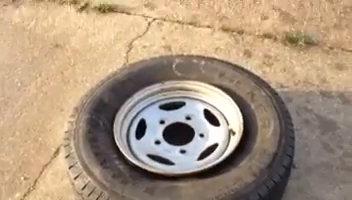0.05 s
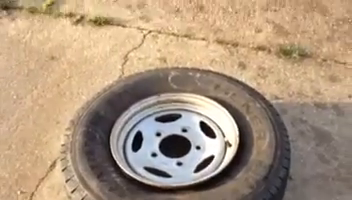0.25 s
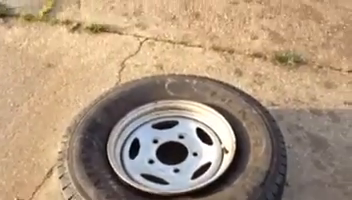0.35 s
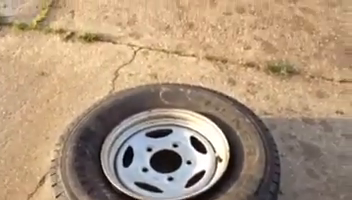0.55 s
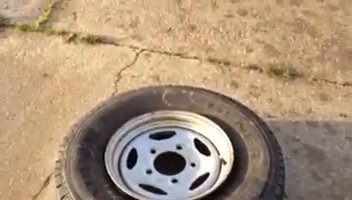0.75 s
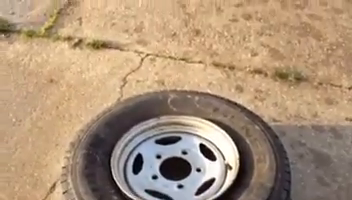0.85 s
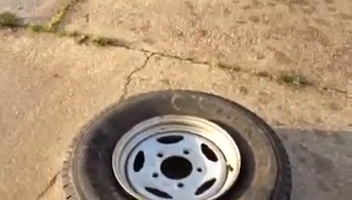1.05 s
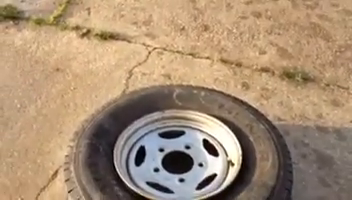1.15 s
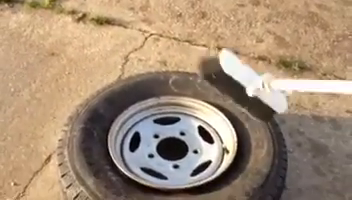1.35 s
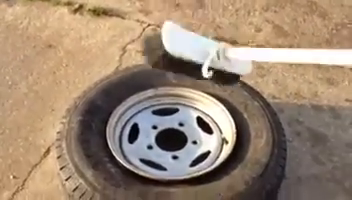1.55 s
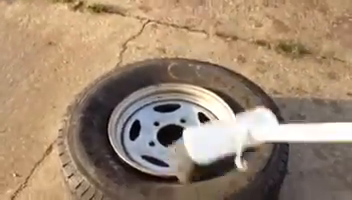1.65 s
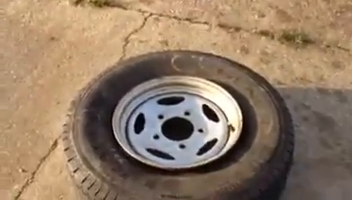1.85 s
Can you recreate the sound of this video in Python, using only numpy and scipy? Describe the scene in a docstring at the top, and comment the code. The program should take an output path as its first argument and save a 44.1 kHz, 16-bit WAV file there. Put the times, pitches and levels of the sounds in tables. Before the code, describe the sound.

Sudden loud bang of a tyre seating on its rim, then faint knocks and ticks.

```python
"""Tyre seating on its rim

A tyre lying on concrete bursts onto its steel rim: the bead snaps over in a volley of cracks and
the rim rings in its normal modes. The rubber thumps and booms, air hisses out until the bead seals,
and the yard reverberates. Two small rattles and a knock follow, then a swish and the ticks of a
broom being moved, over faint outdoor noise."""
import sys
import numpy as np
from scipy import signal
from scipy.fft import rfft, irfft, next_fast_len
from scipy.io import wavfile
from scipy.ndimage import map_coordinates

SR = 44100
rng = np.random.default_rng(int(sys.argv[2]) if len(sys.argv) > 2 else 0)


def materialize(psi):
    """Save the field psi as 16-bit PCM at rate SR to the path in sys.argv[1].

    A 1-D psi becomes a single channel; in a 2-D psi each row is a channel.
    """
    bounded = np.clip(np.atleast_2d(psi).T, -1, 1)
    quanta = np.round(bounded * 32767).astype(np.int16)
    wavfile.write(sys.argv[1], SR, quanta)


N = 83790


def amp(db):
    """Amplitude ratio of a level in decibels."""
    return 10 ** (np.asarray(db) / 20)


def unit(x):
    """Normalisation to unit rms."""
    return x / np.sqrt(np.mean(x ** 2) + 1e-20)


def along(points, hz):
    """Interpolation of (f/Hz, value) points on a logarithmic frequency axis."""
    f, v = np.transpose(points)
    return np.interp(np.log(hz + 1), np.log(f + 1), v)


def since(s):
    """Time elapsed since s, zero before it."""
    return np.maximum(np.arange(N) / SR - s, 0)


def envelope(s, attack, t60, hold=0):
    """Exponential rise from time s; after the hold, a decay of 60 dB per t60."""
    t = since(s)
    return (1 - np.exp(-t / attack)) * 1000. ** (-np.maximum(t - hold, 0) / t60)


def swell(s, rise, fall):
    """Asymmetric Gaussian pulse peaking at time s."""
    t = np.arange(N) / SR - s
    return np.exp(-(t / np.where(t < 0, rise, fall)) ** 2)


def filtered(x, response):
    """Linear filtering: the spectrum is multiplied by a frequency response."""
    size = next_fast_len(N + SR // 4)
    return irfft(rfft(x, size) * response(np.fft.rfftfreq(size, 1 / SR)), size)[:N]


def noise(*spectra):
    """Random-phase noise of unit rms, shaped by the sum of (f/Hz, level/dB) curves."""
    size = next_fast_len(N)
    hz = np.fft.rfftfreq(size, 1 / SR)
    gain = amp(sum(along(curve, hz) for curve in spectra))
    return unit(irfft(gain * np.exp(2j * np.pi * rng.random(len(hz))), size)[:N])


def burst(shape, x):
    """Energy normalisation: x takes the energy of the envelope that shaped it."""
    return unit(x) * np.sqrt(np.mean(shape ** 2))


def ring(modes, s, attack):
    """Modal superposition: damped sinusoids of random phase, excited at time s."""
    return sum(amp(db) * envelope(s, attack, t60) * np.sin(2 * np.pi * (hz * since(s) + rng.random()))
               for hz, db, t60 in modes)


def with_scatter(x, scatter_db=-12.5):
    """Convolution with a short diffuse response adds scatter from the ground and walls."""
    tail = envelope(0, attack=0.0014, t60=0.073) * rng.standard_normal(N)
    return x + amp(scatter_db) * signal.fftconvolve(x, tail / np.linalg.norm(tail))[:N]


# ambient spectrum: f/Hz, relative level/dB
AMBIENT_SPECTRUM = [(25, -28), (60, -13), (120, -8), (190, -4), (300, -14), (500, -14), (650, -16.5),
                    (980, -12), (1400, -15.5), (2000, -20.5), (2900, -29.5), (4300, -29), (7500, -36),
                    (11800, -41.5), (14300, -33.5), (15500, -44)]
# ambient trend: t/s, level/dB
AMBIENT_TREND = [(0, -61.5), (.2, -60.5), (.6, -57.5), (.82, -62), (1.0, -59), (1.2, -57), (1.6, -56.5),
                 (1.9, -59.5)]
# soft bumps: t/s, level/dB, rise/s, fall/s
LOW_BUMPS = [(.097, -49.5, 0.039, 0.016), (0.188, -50.5, 0.015, 0.015), (.545, -55.5, 0.081, 0.018),
             (0.979, -50.5, 0.017, 0.004), (1.201, -55, 0.014, 0.037)]
# their spectrum: f/Hz, relative level/dB
BUMP_SPECTRUM = [(50, -28), (100, -2.5), (135, 1), (190, -10.5), (300, -38), (1000, -68)]


def outdoors(waver_db=1.26, waver_per_s=22):
    """Amplitude modulation: distant noise wavers at random, and low noise swells in soft bumps."""
    t = since(0)
    waver = map_coordinates(rng.standard_normal(256), [t * waver_per_s])
    level_db = np.interp(t, *np.transpose(AMBIENT_TREND)) + waver_db * waver
    bumps = sum(amp(db) * swell(s, rise, fall) for s, db, rise, fall in LOW_BUMPS)
    return amp(level_db) * noise(AMBIENT_SPECTRUM) + bumps * noise(BUMP_SPECTRUM)


# broom contacts: t/s, level/dB, excitation T60/s, resonance f/Hz, quality factor Q
BROOM_CONTACTS = [(1.2913, -51, 0.015, 2020, 8.8), (1.4733, -36.5, 0.0025, 4400, 1.6),
                  (1.4758, -44, 0.0066, 5500, 2), (1.496, -48.5, 0.061, 5500, 2),
                  (1.497, -51, 0.025, 2240, 8.8), (1.508, -47.5, 0.018, 11000, 1.7),
                  (1.536, -51, 0.012, 4900, 2.6), (1.541, -52.5, 0.013, 4900, 2.3),
                  (1.6128, -47, 0.024, 5850, 4), (1.6132, -39, 0.015, 2360, 8),
                  (1.6295, -40, 0.0033, 5500, 3.3), (1.6352, -37.5, .006, 5900, 4),
                  (1.6442, -32, 0.0067, 2780, 2.5), (1.648, -59, 0.028, 3450, 1.4),
                  (1.7052, -60, .02, 12000, 1.9), (1.765, -54.5, 0.0067, 8500, 3),
                  (1.839, -45, 0.015, 1450, 6.7), (1.84, -47, 0.0038, 2870, 5.4)]


def broom_ticks():
    """Forced resonance: each brief contact drives one second-order resonator with noise."""
    out = np.zeros(N)
    for s, db, t60, hz, q in BROOM_CONTACTS:
        resonance = lambda f: 1j * f * hz / (q * (hz * hz - f * f) + 1j * f * hz)
        shape = envelope(s, attack=0.0001, t60=t60, hold=0.00031)
        out += amp(db) * burst(shape, filtered(shape * rng.standard_normal(N), resonance))
    return with_scatter(out)


# broom swishes: t/s, level/dB, rise/s, fall/s
BROOM_STROKES = [(0.898, -52.5, 0.023, 0.026), (1.632, -48, 0.013, 0.012)]
# faint rustle: t/s, level/dB
RUSTLE_TREND = [(0, -73.5), (.8, -76.5), (1.0, -70), (1.15, -66.5), (1.4, -75.5), (1.55, -71), (1.75, -70),
                (1.9, -70)]
# spectrum of both: f/Hz, relative level/dB
BROOM_SPECTRUM = [(300, -5), (1200, -1), (2100, 3), (3200, -12.5), (5000, -3), (7800, -1), (9500, -8.5),
                  (12000, -13.5), (15500, -11)]


def broom_swishes():
    """Modulated broadband noise: the moving broom swishes twice above a faint rustle."""
    strokes = sum(amp(db) * swell(s, rise, fall) for s, db, rise, fall in BROOM_STROKES)
    rustle = amp(np.interp(since(0), *np.transpose(RUSTLE_TREND)))
    return (strokes + rustle) * noise(BROOM_SPECTRUM)


# a click, then a thud: t/s, envelope peak level/dB, rise/s, f/Hz
KNOCK_PULSES = [(.647, -33, 0.00047, 3400), (.647, -30, 0.00018, 4200), (0.648, -38.5, 0.00025, 8000),
                (.647, -46, .00016, 13400), (0.6558, -32, 0.00038, 1700), (0.6553, -30.5, 0.00034, 790),
                (0.6552, -37.5, 0.0011, 324)]


def knock():
    """Heavily damped oscillation: each pulse of a dead double knock lasts only a few cycles."""
    out = np.zeros(N)
    for s, db, rise, hz in KNOCK_PULSES:
        age = since(s) / rise
        out += amp(db) * age * np.exp(1 - age) * np.sin(2 * np.pi * hz * since(s))
    return with_scatter(out)


UPPER_HZ, TOP_HZ = 10100, 13500  # the top shelf of rattles and cracks slopes between these
# wheel rattles: t/s, level/dB, attack/s, T60/s, top shelf/dB
WHEEL_RATTLES = [(0.5209, -50.5, 0.0012, .07, 3), (0.527, -40.5, 0.0019, 0.053, 8),
                 (0.538, -51, 0.00083, 0.069, 1), (0.592, -48.5, 0.00056, 0.069, -5)]
# their spectrum: f/Hz, relative level/dB
RATTLE_SPECTRUM = [(200, -7), (900, 1), (1500, 7), (2150, -1.5), (2600, -14.5), (3900, -15), (5000, -8.5),
                   (7000, -16), (8200, -10.5), (11500, -26), (13500, -6), (15500, -30)]


def wheel_rattles():
    """Impact noise: the settling wheel gives short, exponentially decaying bursts."""
    out = np.zeros(N)
    for s, db, attack, t60, top_db in WHEEL_RATTLES:
        shelf = [(UPPER_HZ, 0), (TOP_HZ, top_db)]
        out += amp(db) * envelope(s, attack, t60, hold=0.0038) * noise(RATTLE_SPECTRUM, shelf)
    return out


# start of the leak: t/s, level/dB
LEAK_ONSET = (0.331, -43.5)
# its spectrum: f/Hz, relative level/dB
LEAK_SPECTRUM = [(400, -2), (2000, 5.5), (3300, -11), (4300, -7.5), (4800, 1), (6600, -5), (8000, -1.5),
                 (9500, -18.5), (12000, -17.5), (13800, -7), (15500, -34)]


def air_leak(seal_s=0.432, sag_db_per_s=101):
    """Jet noise: air hisses through a narrowing gap and stops short when the bead seals."""
    s, db = LEAK_ONSET
    gate = envelope(s, attack=0.0031, t60=0.062, hold=seal_s - s)
    return amp(db - sag_db_per_s * since(s)) * gate * noise(LEAK_SPECTRUM)


# initial spectrum of the yard's echo: f/Hz, relative level/dB
YARD_SPECTRUM = [(40, -32.5), (90, -3.5), (200, -1), (500, -4), (900, -3), (1500, -6.5), (2100, -9.5),
                 (3200, -22), (5000, -10), (7600, -13.5), (9500, -20), (12000, -25.5), (14000, -21.5),
                 (15500, -31)]
# reverberation time: f/Hz, T60/s
YARD_T60 = [(150, 0.87), (500, .42), (1200, .35), (3000, 0.28), (7000, .2), (14000, .21)]


def yard_echo(onset_s=0.241, attack_s=0.0031, level_db=-22):
    """Reverberation: the diffuse field of the bang decays exponentially, the treble first."""
    hz, t, spectrogram = signal.stft(noise(YARD_SPECTRUM), SR, nperseg=256)
    decay = amp(-60 * np.maximum(t - onset_s, 0) / along(YARD_T60, hz)[:, None])
    tail = signal.istft(spectrogram * decay, SR)[1][:N]
    build_up = 1 - np.exp(-since(onset_s) / attack_s)
    return amp(level_db) * build_up * tail


# rubber carcass: f/Hz, relative level/dB, T60/s
CARCASS_MODES = [(154, -5.5, .18), (196, -3, .26), (234, -13, .15), (268, -10, .22), (310, -18, .15)]
# its excitations: t/s, gain/dB
CARCASS_THUMPS = [(.232, -29.5), (.249, -25), (0.273, -25), (.296, -23.5), (.356, -25)]
# booms of the inflated tyre: t/s, level/dB, hold/s
TYRE_BOOMS = [(0.246, -42.5, .025), (0.319, -29.5, .082)]


def rubber(boom_hz=117.5):
    """Damped vibration: the stretching carcass thumps in its modes; the filled tyre booms at one pitch."""
    thumps = sum(amp(db) * ring(CARCASS_MODES, s, attack=0.0011) for s, db in CARCASS_THUMPS)
    booms = np.zeros(N)
    for s, db, hold in TYRE_BOOMS:
        shape = envelope(s, attack=0.0037, t60=0.18, hold=hold)
        booms += amp(db) * shape * np.sin(2 * np.pi * boom_hz * since(s))
    return thumps + booms


# steel rim: f/Hz, relative level/dB, T60/s
RIM_MODES = [(394, -17, .17), (514, -29, .24), (736, -24, .2), (802, -26, .24), (1043, -26.5, .19),
             (1500, -29, .13), (1842, -24, .14), (1992, -25, .19), (2061, -25.5, .17), (2564, -27.5, .1),
             (5045, -31, .14), (5539, -28, .13), (5846, -21.5, .11), (6560, -29, .13), (7620, -23.5, .11)]


def steel_rim(strike_s=0.232, gain_db=-2):
    """Free vibration: struck by the bead, the rim rings in its normal modes."""
    return amp(gain_db) * ring(RIM_MODES, strike_s, attack=0.004)


BASS_HZ, MID_HZ, TREBLE_HZ = 900, 2100, 4900
# bead cracks: t/s, level/dB, T60/s, then bass/dB, treble/dB, top/dB relative to MID_HZ
BEAD_CRACKS = [(0.2313, -14, 0.02, -11, -0.5, 2.5), (0.2351, -17, .018, 7.5, -9.5, 0.5),
               (0.242, -16.5, 0.022, -8, 6, -1), (0.2468, -15, 0.04, -6.5, 2, 4.5),
               (0.2634, -17.5, 0.036, 2, -16, -7.5), (0.2717, -27, 0.078, -1.5, -2.5, 7),
               (0.3183, -34.5, 0.023, -13, -2.5, 2)]
# their common spectrum: f/Hz, relative level/dB
CRACK_SPECTRUM = [(60, -33.5), (170, -10), (400, 0), (560, -12.5), (780, -2), (1030, 2.5), (1300, -3),
                  (2100, 1), (2800, -5), (3300, -13), (4500, -9.5), (5800, -1), (6600, -9.5), (7750, 2),
                  (8500, -18.5), (11000, -14), (12000, -24.5), (13800, -14.5), (15500, -24)]


def bead_cracks():
    """Broadband transients: the bead snaps over the rim in stages, each with its own brightness."""
    out = np.zeros(N)
    for s, db, t60, bass_db, treble_db, top_db in BEAD_CRACKS:
        tone = [(BASS_HZ, bass_db), (MID_HZ, 0), (TREBLE_HZ, treble_db),
                (UPPER_HZ, treble_db), (TOP_HZ, top_db)]
        shape = envelope(s, attack=0.00023, t60=t60, hold=0.0016)
        out += amp(db) * burst(shape, shape * noise(CRACK_SPECTRUM, tone))
    return out


def scene():
    """Linear superposition: the pressures of all sources add at one point."""
    bang = steel_rim() + bead_cracks() + rubber() + yard_echo()
    aftermath = air_leak() + wheel_rattles() + knock() + broom_ticks() + broom_swishes()
    return (bang + aftermath + outdoors())[None]


def record(dry, low_cut_hz=70, high_cut_hz=15300):
    """Band limiting: a small microphone loses the deep bass, and the highest treble is cut steeply."""
    high_pass = signal.butter(2, low_cut_hz, "highpass", fs=SR, output="sos")
    thin = signal.sosfilt(high_pass, dry[0])
    return filtered(thin, lambda hz: 1 / np.sqrt(1 + (hz / high_cut_hz) ** 300))[None]


dry = scene()
out = record(dry)
materialize(out)
```